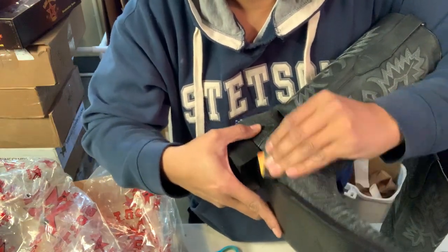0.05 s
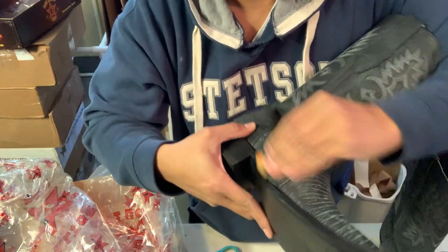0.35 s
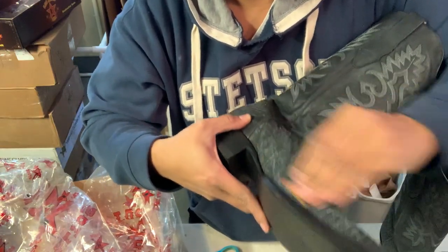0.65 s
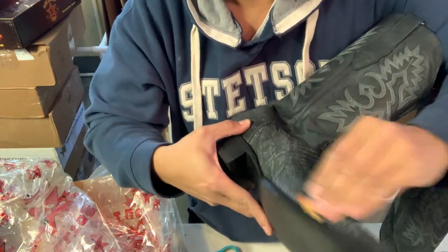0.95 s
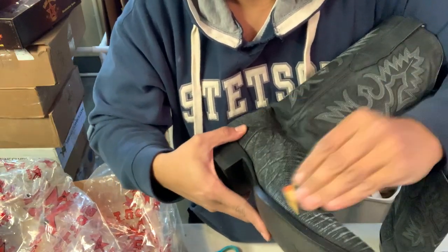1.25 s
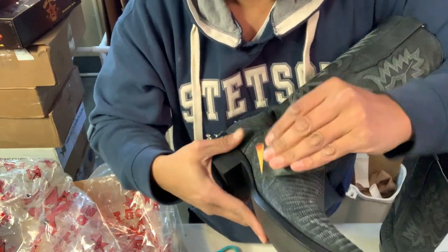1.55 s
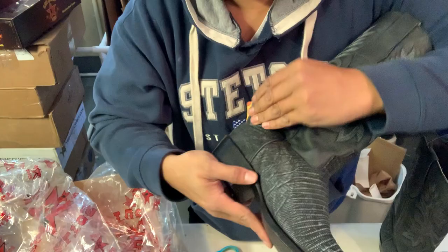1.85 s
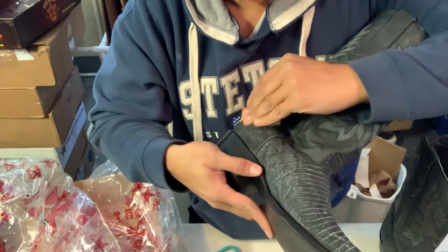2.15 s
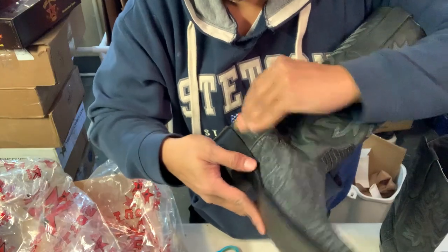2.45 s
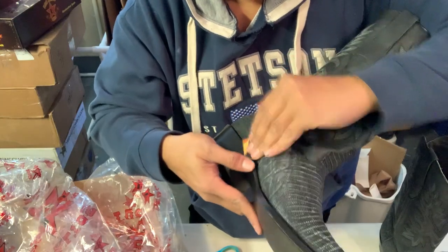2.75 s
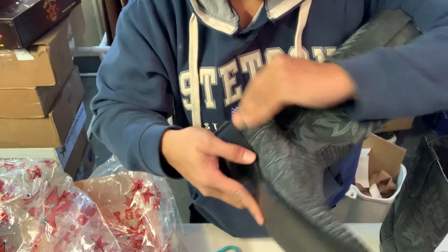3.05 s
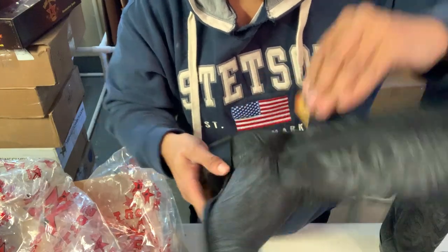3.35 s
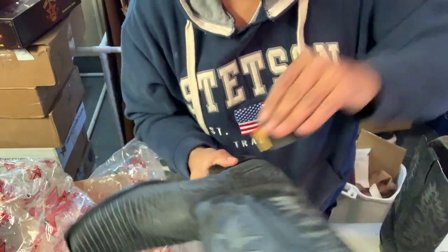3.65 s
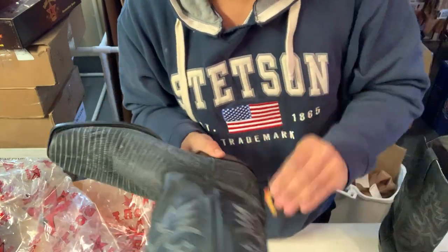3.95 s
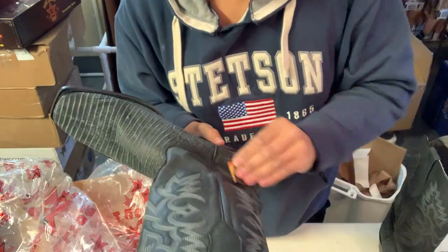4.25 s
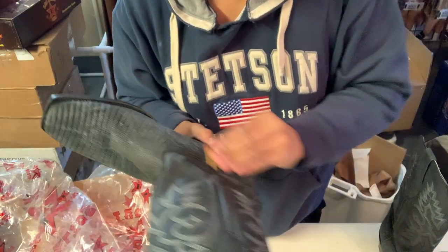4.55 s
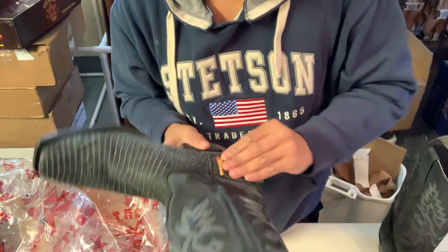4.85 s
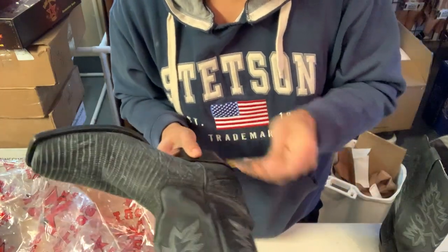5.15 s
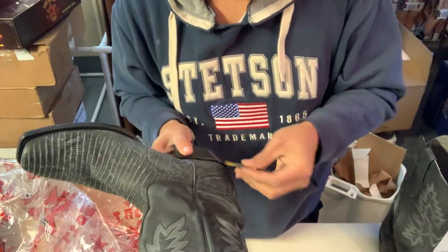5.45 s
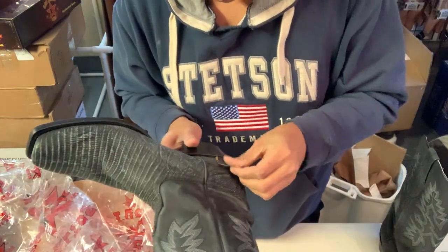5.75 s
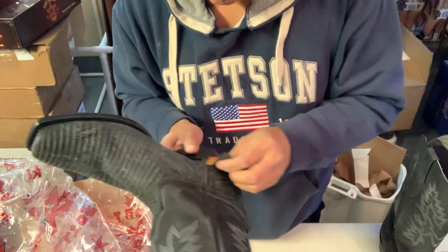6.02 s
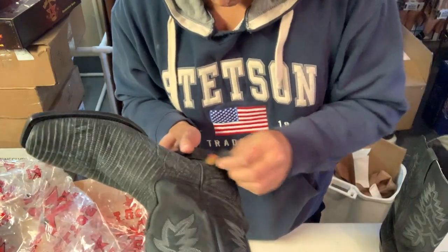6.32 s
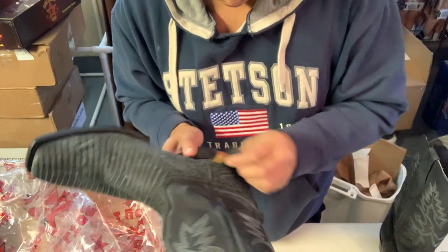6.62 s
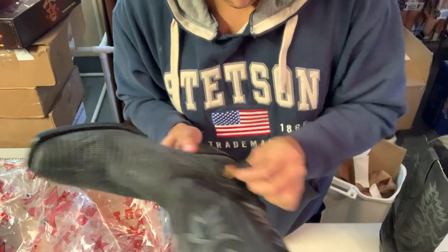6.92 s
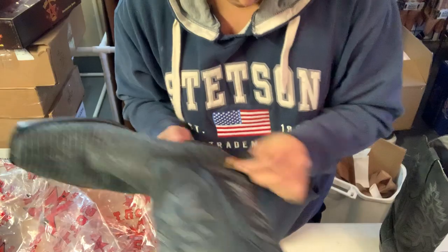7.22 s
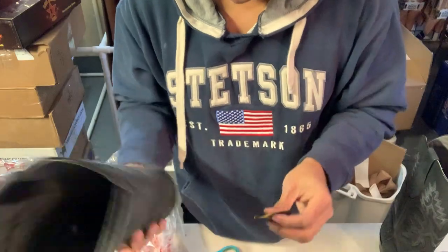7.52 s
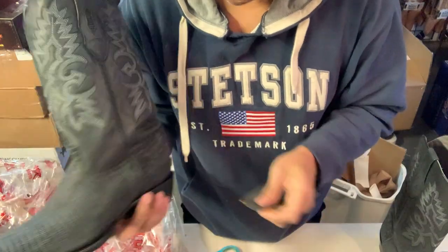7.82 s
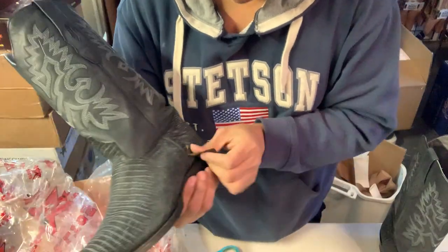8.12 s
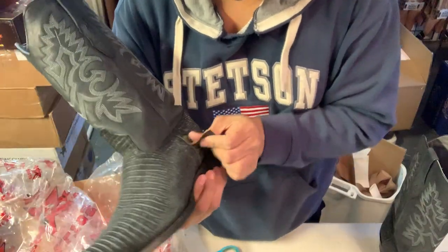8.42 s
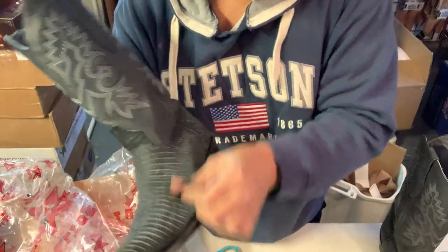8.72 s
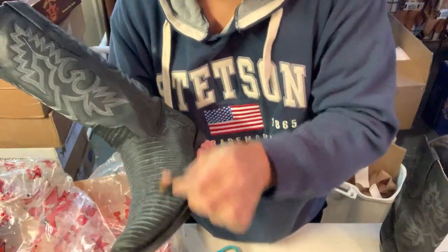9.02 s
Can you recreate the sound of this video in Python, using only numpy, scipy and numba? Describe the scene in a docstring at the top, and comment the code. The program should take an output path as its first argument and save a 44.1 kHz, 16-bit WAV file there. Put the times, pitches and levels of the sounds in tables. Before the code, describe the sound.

Sandpaper rasps back and forth over a hollow leather boot in quick runs of strokes, with light taps and soft thumps between.

```python
"""First comes a gritty hiss: folded sandpaper rubbed back and forth over a leather boot, close to a phone.
On each stroke the grit rasps over the leather and shakes the hollow boot. The paper taps as it lands
and squeaks where its edge catches. Bumps make the boot thump, and shifting fingers make it rumble.
Soft, airy rustles come in the pauses between runs of strokes.
The small workshop adds a short echo and a faint, steady rush of air."""
import sys
import numpy as np
from scipy import signal
from scipy.fft import rfft, irfft, next_fast_len
from scipy.io import wavfile
from numba import njit

SR = 44100
rng = np.random.default_rng(int(sys.argv[2]) if len(sys.argv) > 2 else 0)


def wrap_up_sound(samples):
    """Save the sound to the file named by the first command line argument, as 16-bit audio."""
    columns = np.atleast_2d(samples).T
    # keep every value between -1 and 1, then stretch to whole-number steps
    tamed = np.clip(columns, -1, 1)
    steps = np.round(tamed * 32767).astype(np.int16)
    wavfile.write(sys.argv[1], SR, steps)


N = 404838
TIME = np.arange(N) / SR

# Two terms: t60 is the time a sound takes to fade by 60 dB; a higher Q means a sharper, longer ring.
# passes of the paper: start/s, end/s, fastest moment/share of the stroke, level/dB, rasp boost/dB
PAPER_STROKES = [(-0.07, 0.166, 0.35, -32, -9.5), (0.162, 0.196, 0.67, -51, -1),
                 (0.281, 0.303, 0.85, -49.5, 2.5), (0.314, 0.577, 0.27, -36.5, -7.5),
                 (0.662, 0.703, 0.09, -59.5, 10), (0.685, 0.889, 0.32, -35.5, -8),
                 (0.881, 0.924, 0.57, -54, -0.5), (1.017, 1.225, 0.31, -33.5, -9),
                 (1.336, 1.523, 0.35, -33.5, -6), (1.489, 1.517, 0.75, -38.5, -7.5),
                 (1.538, 1.599, 0.75, -44.5, -2.5), (1.692, 1.801, 0.35, -46.5, -0.5),
                 (1.771, 1.887, 0.53, -40, -4.5), (1.85, 1.979, 0.28, -38, -4.5),
                 (2.092, 2.126, 0.14, -62, 10), (2.109, 2.239, 0.48, -38.5, -7),
                 (2.233, 2.365, 0.8, -34.5, -8.5), (2.361, 2.482, 0.51, -37, -6.5),
                 (2.497, 2.591, 0.49, -34, -8.5), (2.591, 2.715, 0.34, -35, -8),
                 (2.721, 2.821, 0.81, -33.5, -8.5), (2.83, 2.944, 0.28, -35.5, -7.5),
                 (2.947, 3.054, 0.76, -32.5, -9), (3.059, 3.149, 0.6, -31.5, -8.5),
                 (3.176, 3.314, 0.32, -37, -8.5), (3.834, 3.94, 0.2, -58.5, 8),
                 (3.897, 3.987, 0.6, -35, -8), (4.148, 4.312, 0.47, -43, -4), (4.308, 4.418, 0.6, -36, -8),
                 (4.445, 4.565, 0.48, -38.5, -8.5), (4.558, 4.725, 0.55, -35, -8),
                 (4.714, 4.903, 0.54, -38, -5), (4.926, 5.087, 0.43, -47, -2.5),
                 (5.078, 5.276, 0.5, -67, 4.5), (5.28, 5.356, 0.44, -65.5, -2.5),
                 (5.364, 5.477, 0.7, -75, 9), (5.451, 5.54, 0.7, -58.5, -1), (5.752, 5.895, 0.34, -60.5, 6),
                 (5.852, 6.012, 0.74, -47.5, -1.5), (6.019, 6.162, 0.61, -41.5, -8.5),
                 (6.167, 6.288, 0.62, -39.5, -6.5), (6.306, 6.428, 0.6, -46, -1),
                 (6.444, 6.567, 0.63, -39.5, -3), (6.57, 6.752, 0.46, -43.5, -2.5),
                 (6.735, 6.884, 0.62, -38, -3.5), (6.871, 7.04, 0.69, -36.5, -8.5),
                 (7.029, 7.177, 0.49, -38.5, -7), (7.185, 7.345, 0.61, -35.5, -7.5),
                 (8.09, 8.156, 0.67, -58, 2), (8.148, 8.301, 0.6, -46.5, 0.5),
                 (8.288, 8.415, 0.36, -40.5, -3.5), (8.411, 8.735, 0.67, -36.5, -6),
                 (8.723, 8.896, 0.37, -39.5, -6.5), (8.885, 9.041, 0.58, -36.5, -7),
                 (9.037, 9.199, 0.61, -36, -9.5)]
# the spot under the paper: t/s, scrape boost/dB, body boost/dB, wall pitch/Hz, left microphone's lead/ms
BOOT_SPOTS = [(.05, -11.5, -15, 255, 0.013), (.45, -8.5, -9, 235, 0.034), (1.1, -2.5, -4.5, 245, 0.043),
              (1.6, -5.5, -8.5, 217, 0.048), (2.15, -9.5, -11.5, 220, 0.058),
              (2.55, -15, -21.5, 302, 0.055), (3.1, -15, -19, 252, 0.052), (3.25, -6.5, -9.5, 262, 0.065),
              (3.95, -7, -10, 245, 0.088), (4.6, -2, -9, 370, 0.11), (4.85, -10.5, -11, 197, 0.098),
              (5.3, -16.5, -31.5, 186, 0.11), (6.15, -17, -26, 318, 0.1), (6.6, -13.5, -16, 197, 0.11),
              (7.25, -10.5, -10, 224, 0.11), (8.25, -16, -26.5, 260, .12), (8.75, -11.5, -6, 322, 0.13),
              (9.15, -10.5, -3, 318, 0.135)]
# the paper's fold rings differently with each grip: t/s, pitch at full speed/Hz, ring level/dB
FOLD_RINGS = [(1.2, 4600, -17), (1.9, 3700, -8), (2.5, 3820, -11), (3.1, 3780, -8), (4.6, 4200, -7),
              (6.2, 3800, -8), (6.55, 3420, -6), (6.82, 2560, 7), (7.1, 3560, -5), (8.3, 4050, -10),
              (8.55, 5650, -2), (9.1, 5700, 10)]
# tone of the rubbing grit: f/Hz, level/dB
GRIT_TONE = [(100, 2), (180, 4), (310, 4), (420, 5.5), (560, -6.5), (740, -1.5), (1020, -4.5), (1300, 1),
             (1850, 0), (2500, -3), (3600, 1.5), (4500, 1.5), (5800, -0.5), (7200, 2.5), (8600, -1),
             (10500, 6.5), (13000, 5), (16000, 6)]
# ranges of a stroke's hiss, rasp, scrape and body: low f/Hz, high f/Hz
LAYER_BANDS = [(7000, 15800), (2500, 7000), (650, 2500), (130, 650)]
# the stiff leather's rings: f/Hz, Q, level/dB
LEATHER_RINGS = [(728, 6.1, 2), (1164, 4.3, -2), (1806, 5.4, -2.5)]
# tone of the boot moving in the hand: f/Hz, level/dB
RUMBLE_TONE = [(20, -60), (40, -12), (60, 1.5), (85, -3.5), (125, -5), (190, -2.5), (400, -42.5),
               (2000, -101)]
# how much sound bounces off hands and bench: f/Hz, level/dB
SCATTER_TONE = [(200, -5.5), (700, -7), (4000, -6), (6500, -9.5), (9000, 4.5), (15000, -28)]
# tone of the workshop's air: f/Hz, level/dB
AIR_TONE = [(25, -21), (60, -4), (150, -7.5), (300, -17.5), (1000, -22.5), (4000, -23), (9000, -30),
            (15000, -34)]
# how long the workshop echoes: f/Hz, t60/s
ECHO_FADE = [(150, 0.38), (1000, 0.34), (4000, 0.25), (9000, 0.32), (15000, 0.16)]
# tone of that echo: f/Hz, level/dB
ECHO_TONE = [(200, 4), (1000, 3.5), (4500, 2), (9000, 1), (16000, -4)]
# the paper lands or its edge catches: t/s, slap level/dB, scratch level/dB, slap t60/s
PAPER_TAPS = [(0.2844, -61, -38, .03), (.335, -62, -35, 0.06), (.373, -62, -29, 0.087),
              (0.6677, -55, -51, 0.034), (.7, -63, -44, .04), (1.0156, -38, -33, .022),
              (1.0235, -37, -47, 0.018), (1.3384, -41, -44, .02), (1.507, -40, -30.5, 0.021),
              (1.585, -38, -54, 0.026), (1.591, -35, -54, 0.021), (1.6926, -48.5, -63, 0.049),
              (1.8602, -39.5, -31.5, .043), (2.0986, -48, -60, .043), (2.333, -41.5, -44, 0.053),
              (2.451, -43.5, -39, 0.048), (2.742, -50.5, -41, .04), (2.8554, -48.5, -32, .043),
              (3.012, -45, -40, 0.015), (3.08, -49.5, -31, 0.048), (3.192, -47, -39.5, 0.044),
              (3.85, -35, -61, 0.03), (3.946, -42, -54, .08), (4.159, -37, -58, 0.038),
              (4.164, -37, -40, 0.018), (4.583, -53, -36.5, 0.039), (4.797, -39.5, -63, 0.039),
              (5.639, -57.5, -60, 0.091), (5.673, -44.5, -41.5, 0.033), (6.185, -69, -42, 0.036),
              (6.456, -66, -44, .043), (7.32, -37.5, -34.5, 0.036), (7.5, -83, -58, .043),
              (7.521, -56, -52.5, 0.048), (8.097, -51, -74, .043), (8.12, -49, -46.5, 0.1),
              (8.742, -51, -41, 0.05)]
# tone of paper slapping leather: f/Hz, level/dB
SLAP_TONE = [(150, 1.5), (400, 1.5), (1200, 10), (2200, 5.5), (4000, 7), (5500, -37.5), (12000, -7)]
# the boot is bumped or gripped anew: t/s, thump level/dB, wall pitch/Hz, boom level/dB
BOOT_KNOCKS = [(0.673, -61, 149, -56.5), (1.023, -45, 218, -59), (1.08, -44, 240, -62),
               (1.374, -39.5, 254, -62), (1.697, -44.5, 239, -57), (2.103, -45.5, 216, -49),
               (2.803, -46, 214, -69), (2.824, -46.5, 163, -67), (3.535, -55, 288, -67),
               (3.622, -55.5, 260, -74), (3.853, -34.5, 185, -38.5), (3.99, -41, 212, -48),
               (4.165, -34, 160, -36), (4.679, -41, 169, -51), (5.04, -66, 131, -52),
               (5.671, -48.5, 664, -78), (5.673, -47, 470, -76), (6.603, -46, 295, -66),
               (6.805, -47, 474, -70), (7.113, -46, 470, -70), (7.346, -39, 289, -53),
               (7.521, -52, 656, -70), (7.522, -50.5, 267, -43), (7.758, -43.5, 243, -52),
               (7.952, -61, 220, -68), (8.099, -50.5, 311, -70), (8.316, -49, 325, -78)]
# the rings of the boot's hollow: f/Hz, level/dB, t60/s
HOLLOW_RINGS = [(58.9, -6, 0.12), (117, -13.5, 0.098), (204, -25, 0.073), (421, -23, 0.068),
                (710, -34, 0.044)]
# the hands shift their hold: start/s, end/s, level/dB
HAND_SHIFTS = [(1.35, 1.526, -62.5), (2.82, 2.918, -64), (3.9, 4.054, -55), (4.72, 5.11, -64),
               (5.92, 6.007, -68.5), (6.241, 6.31, -66.5), (6.36, 7.613, -57.5), (8.9, 9.25, -75)]
# the paper's edge catches and chatters: start/s, end/s, first pitch/Hz, last pitch/Hz, level/dB
EDGE_SQUEAKS = [(1.495, 1.519, 2520, 2420, -45), (1.55, 1.585, 4200, 3200, -41.5),
                (1.583, 1.591, 1300, 1150, -44), (3.262, 3.297, 3270, 2700, -47.5),
                (3.271, 3.29, 1470, 1260, -53.5), (6.22, 6.269, 3840, 3500, -50),
                (7.305, 7.328, 2600, 2440, -46.5)]
# soft, airy rustles in the pauses between runs of strokes: start/s, end/s, level/dB, treble boost/dB
SOFT_RUSTLES = [(3.287, 3.825, -67.5, -3.5), (3.52, 3.59, -60.5, -11), (3.596, 3.746, -58, -34),
                (7.265, 7.402, -54, -1), (7.485, 7.632, -70, 6.5), (7.741, 7.93, -61, 5),
                (7.823, 8.197, -64, 3.5)]
# tone of those rustles: f/Hz, level/dB
RUSTLE_TONE = [(60, -12), (280, -11.5), (600, -11), (1400, -11), (4000, -10), (8000, -13.5), (16000, -13.5)]
# the part of the room's sound that the two microphones hear oppositely: f/Hz, level/dB
SIDE_TONE = [(60, -3.5), (250, -5), (600, 2.5), (6500, -14), (8300, -38), (9500, -2.5), (16000, -22)]
# how far the left microphone's wave runs ahead in the high treble: f/Hz, phase/radians
MIC_PHASE = [(8400, 3), (9600, 2.3), (11000, 1.1), (12000, .15), (13000, -.25), (14000, -1.2), (16000, -3)]
# the left microphone is weaker in the bass: f/Hz, left minus right level/dB
MIC_BALANCE = [(50, -3), (180, -4), (350, -4.5), (650, 1), (16000, -0.5)]

HISS_DB, RASP_DB, SCRAPE_DB, BODY_DB, ROCKING_DB = -3.5, -3, -4, -6, -29.5  # balance within a stroke
# layers grow as speed to these powers: hiss needs speed, but these go on while the paper slows
RASP_POWER, SCRAPE_POWER, BODY_POWER = 0.58, 0.37, 0.42
STROKE_CURVE, PRESS_POWER = 1.635, 2.7  # higher values narrow the peaks of speed and of hand pressure
WALL_SPREAD, WALL_FALL, WALL_WANDER = 0.12, 1.44, 0.19  # octaves: between strokes, over one, wavering
FOLD_SAG, FOLD_WANDER = 0.19, 0.15  # octaves: drop at rest, wavering
LEATHER_WANDER = 0.11  # octaves
SNAGS_PER_S, SNAG_DB = 37, -17.5
STICK_S, STICK_SHARE, STUCK_DB, BITE_DB, BITE_S = 0.072, 0.088, 1, 3.5, 0.022
AIR_DB, ECHO_DB, SCATTER_STEP_S = -75.5, -15.5, 0.02
TAP_RISE_S = 0.0003  # the leather gives way under a tap
YIELD_OCTAVES, YIELD_S, KNOCK_T60_S, BOOM_RISE_S = 0.2, 0.024, 0.052, 0.019
SLIP_DB, SLIPS_PER_S = 1.5, 21  # how unevenly the fingers slip, and how often
CHATTER_HZ, CHATTER_OCTAVES, CHATTER_DB = 261, 0.3, 6  # a squeak's flutter: rate, wavering, depth
TOP_HZ = 15850


def undb(db):
    """Turn decibels into a number to multiply by."""
    return 10 ** (np.asarray(db) / 20)


def unit(x):
    """Scale a sound to an average power of 1."""
    return x / np.sqrt(np.mean(x ** 2) + 1e-24)


def freqs(x):
    """The frequencies that make up x."""
    return np.maximum(np.fft.rfftfreq(x.shape[-1], 1 / SR), 1)


def lookup(table, hz):
    """Read a table by frequency, sliding between its rows evenly in pitch."""
    f, value = np.transpose(table)
    return np.interp(np.log(hz), np.log(f), value)


def at_time(table, s):
    """Read a table's columns at one moment."""
    when, *columns = np.transpose(table)
    return [np.interp(s, when, column) for column in columns]


def colour(x, table):
    """Give a sound the tone in a table of f/Hz, level/dB."""
    padded = np.pad(x, (0, next_fast_len(len(x), True) - len(x)))
    gain = undb(lookup(table, freqs(padded)))
    return irfft(rfft(padded) * gain, len(padded))[:len(x)]


def band(x, lo, hi, order=3):
    """Keep the frequencies between lo and hi."""
    sections = signal.butter(order, [lo, min(hi, SR / 2 - 100)], "band", fs=SR, output="sos")
    return signal.sosfilt(sections, x)


def add(out, s, x):
    """Mix x into out, starting at s seconds."""
    i = int(s * SR)
    x = x[..., max(-i, 0):N - i]
    out[..., max(i, 0):max(i, 0) + x.shape[-1]] += x


def wander(n, rate):
    """Drift about 1 either side of zero, toward a new random value rate times a second."""
    return 1.2 * np.interp(np.arange(n) * rate / SR, np.arange(4096), rng.standard_normal(4096))


def hump(t, length, crest):
    """A smooth swell: from zero to 1 at the crest (a share of its length) and back to zero."""
    peak = np.clip(crest, .02, .98) * length
    return np.sin(np.pi / 2 * np.interp(t, [0, peak, length], [0, 1, 0]))


@njit
def resonate(x, hz, q):
    """Make x ring at a pitch that can keep moving."""
    out, band_state, low_state = np.empty(len(x)), 0., 0.
    for i in range(len(x)):
        tuning = np.tan(np.pi * hz[i] / SR)
        ring = (band_state + tuning * (x[i] - low_state)) / (1 + tuning * (tuning + 1 / q))
        band_state = 2 * ring - band_state
        low_state += 2 * tuning * ring
        out[i] = ring / q
    return out


def sanding():
    """On each stroke the grit judders over the leather, shakes the boot and rocks it in the hand."""
    out = np.zeros((2, N))
    for start, end, crest, db, rasp_db in PAPER_STROKES:
        scrape_db, body_db, wall_hz, lead_ms = at_time(BOOT_SPOTS, (start + end) / 2)
        fold_hz, fold_db = at_time(FOLD_RINGS, (start + end) / 2)
        length = end - start
        t = TIME[:int(length * SR) + SR // 20]
        n = len(t)
        speed = hump(t, length, crest) ** STROKE_CURVE
        judder = wander(n, rate=328.2) + 2.13 * wander(n, rate=66.7)
        fine = colour(grit(n, spread_db=4.5) * undb(0.58 * judder), GRIT_TONE)
        coarse = unit(colour(grit(n, spread_db=2.5) * undb(0.81 * judder), GRIT_TONE))

        shake = boot_shake(coarse, wall_hz, speed, progress=np.minimum(t / length, 1))
        fold = undb(fold_db) * fold_ring(coarse, fold_hz, speed)
        layers = fine, coarse + fold, leather_scrape(coarse), shake
        hiss, rasp, scrape, body = (unit(band(x, *edges)) for x, edges in zip(layers, LAYER_BANDS))
        rocking = unit(colour(rng.standard_normal(n), RUMBLE_TONE))
        catches = unit(undb(1.4 * wander(n, rate=48.3)))

        rough = speed ** RASP_POWER * (undb(RASP_DB) * rasp + undb(SNAG_DB) * snags(n))
        rough += undb(scrape_db + SCRAPE_DB) * speed ** SCRAPE_POWER * catches * scrape
        boot = speed ** BODY_POWER * (undb(body_db + BODY_DB) * body + undb(ROCKING_DB) * rocking)
        paper = bite(t, length) * (undb(HISS_DB) * speed * hiss + undb(rasp_db) * rough)
        sound = undb(db) * (paper + undb(rasp_db) * boot)
        bounces = [scatter(colour(sound, SCATTER_TONE), t60=0.021) for _ in range(2)]
        add(out, start, microphones(sound, lead_ms) + all_around(*bounces))
    return out


def grit(n, spread_db):
    """Countless tiny cracks of very unequal size blend into noise."""
    return unit(rng.standard_normal(n) * undb(spread_db * np.clip(rng.standard_normal(n), -3, 3)))


def boot_shake(rubbing, hz, speed, progress):
    """The wall's ring sinks in pitch as the paper travels, and swells as the hand bears down."""
    octaves = WALL_SPREAD * rng.standard_normal() + WALL_FALL * (.4 - progress)
    octaves += WALL_WANDER * wander(len(rubbing), rate=29.6)
    ring = unit(wall_ring(rubbing, hz * 2 ** octaves, q=3.9))
    return ring * speed ** PRESS_POWER + 4.1 * rubbing


def wall_ring(x, hz, q):
    """The boot's leather wall rings briefly at one main pitch, with weaker ones on either side."""
    return sum(undb(db) * resonate(x, hz * ratio, float(q))
               for ratio, db in [(.63, -9), (1, -1.5), (1.45, -10.5), (2.6, -5)])


def fold_ring(rubbing, hz, speed):
    """The paper's fold rings unsteadily, lower when the hand moves slowly."""
    octaves = FOLD_SAG * (speed - 1) + FOLD_WANDER * wander(len(rubbing), rate=30)
    return resonate(rubbing, hz * 2 ** octaves, q=5.8)


def leather_scrape(rubbing):
    """Scraped leather adds a few stiff rings that shift with the pressure of the hand."""
    shift = 2 ** (LEATHER_WANDER * wander(len(rubbing), rate=19.5))
    return rubbing + sum(undb(db) * resonate(rubbing, hz * shift, float(q)) for hz, q, db in LEATHER_RINGS)


def snags(n):
    """Single coarse grains snag on the leather with dry ticks."""
    snagged = rng.random(n) < SNAGS_PER_S / SR
    clicks = snagged * rng.uniform(0.45, 1, n) * np.sqrt(SR / SNAGS_PER_S)
    t = TIME[:SR // 100]
    tick = band(rng.standard_normal(len(t)) * np.exp(-t / 0.0013), 1190, 2450, order=2)
    return signal.fftconvolve(clicks, tick / np.linalg.norm(tick))[:n]


def bite(t, length):
    """The paper sticks as a stroke starts, then gets louder for a moment as it breaks free."""
    since_free = t - min(STICK_S, STICK_SHARE * length)
    return undb(np.where(since_free < 0, STUCK_DB, BITE_DB * np.exp(-np.abs(since_free) / BITE_S)))


def scatter(x, t60):
    """Sound bounces off leather, hand and bench in a pattern that changes as the hand moves."""
    t, step = TIME[:SR // 32], int(SCATTER_STEP_S * SR)
    centres = np.arange(0, len(x) + step, step)[:, None]
    fades = np.sqrt(np.maximum(1 - np.abs(np.arange(len(x)) - centres) / step, 0))
    patterns = rng.standard_normal((len(centres), len(t))) * undb(-60 * t / t60)
    patterns /= np.linalg.norm(patterns, axis=1, keepdims=True)
    return signal.fftconvolve(x * fades, patterns, axes=1).sum(axis=0)[:len(x)]


def room_air():
    """The workshop's air is a steady noise, strongest in the bass."""
    return unit(colour(rng.standard_normal(N), AIR_TONE))


def room_echo(x):
    """The workshop answers with a short echo whose highest treble fades first."""
    t, tail = TIME[:SR // 2], 0
    edges = np.geomspace(60, 16000, 9)
    for lo, hi in zip(edges, edges[1:]):
        decay = undb(-60 * t / lookup(ECHO_FADE, np.sqrt(lo * hi)))
        tail = tail + band(rng.standard_normal(len(t)), lo, hi) * decay * (t > .005)
    tail = colour(tail / np.linalg.norm(tail), ECHO_TONE)
    return signal.fftconvolve(x, tail)[:N]


def taps():
    """The stiff paper slaps the leather: a short dull crack with a scratch of grit."""
    out, t = np.zeros(N), TIME[:SR // 10]
    for s, slap_db, scratch_db, t60 in PAPER_TAPS:
        fade = undb(-60 * t / t60) * (1 - np.exp(-t / TAP_RISE_S))
        slap = unit(colour(grit(len(t), spread_db=2), SLAP_TONE))
        scratch = unit(band(rng.standard_normal(len(t)), 5500, 12000, order=2))
        add(out, s, undb(slap_db) * slap * fade + undb(scratch_db) * scratch * fade ** 1.16)
    return microphones(out, lead_ms=0.057)


def knocks():
    """A soft blow thumps the wall, whose pitch sinks as the leather gives; the hollow booms after it."""
    out, t = np.zeros(N), TIME[:SR // 2]
    hollow = sum(undb(db - 60 * t / t60) * np.sin(2 * np.pi * hz * t) for hz, db, t60 in HOLLOW_RINGS)
    boom = hollow * (1 - np.exp(-(t / BOOM_RISE_S) ** 2))
    for s, db, wall_hz, boom_db in BOOT_KNOCKS:
        push = np.sin(2 * np.pi * np.minimum(t * wall_hz, 1))  # a single swing
        octaves = YIELD_OCTAVES * (np.exp(-t / YIELD_S) - .7)
        thump = wall_ring(push, wall_hz * 2 ** octaves, q=np.pi * wall_hz * KNOCK_T60_S / np.log(1000))
        add(out, s, undb(db) * thump / np.abs(thump).max() + undb(boom_db) * boom / np.abs(boom).max())
    return microphones(out, lead_ms=.05)


def finger_rumble():
    """Fingers slip and catch on the boot with a low rumble."""
    out = np.zeros(N)
    for start, end, db in HAND_SHIFTS:
        t = TIME[:int((end - start) * SR)]
        slips = rng.standard_normal(len(t)) * undb(SLIP_DB * wander(len(t), SLIPS_PER_S))
        rumble = colour(slips, RUMBLE_TONE) * hump(t, end - start, crest=0.51)
        add(out, start, undb(db) * unit(rumble))
    return microphones(out, lead_ms=0.06)


def squeaks():
    """The paper's edge sticks and slips quickly, with a ring that sinks as the paper bends."""
    out = np.zeros(N)
    for start, end, first_hz, last_hz, db in EDGE_SQUEAKS:
        t = TIME[:int((end - start) * SR)]
        cycles = np.cumsum(CHATTER_HZ * 2 ** (CHATTER_OCTAVES * wander(len(t), rate=222))) / SR
        slips = rng.standard_normal(len(t)) * undb(CHATTER_DB * np.cos(2 * np.pi * cycles))
        ring = resonate(slips, np.geomspace(first_hz, last_hz, len(t)), q=5.6)
        add(out, start, undb(db) * unit(ring) * hump(t, end - start, crest=0.78))
    return microphones(out, lead_ms=0.061)


def soft_rustle():
    """Soft, airy noise swells, flickers and fades in the pauses between runs of strokes."""
    out = np.zeros(N)
    for start, end, db, treble_db in SOFT_RUSTLES:
        t = TIME[:int((end - start) * SR)]
        flickering = rng.standard_normal(len(t)) * undb(2.1 * wander(len(t), rate=59.6))
        airy = unit(colour(flickering, RUSTLE_TONE))
        rustle = colour(airy, [(1500, 0), (8000, treble_db)])
        add(out, start, undb(db) * rustle * hump(t, end - start, crest=0.33))
    return microphones(out, lead_ms=0.06)


def microphones(x, lead_ms):
    """Sound reaches the left microphone first; in the high treble the phone itself sets the timing."""
    padded = np.pad(x, (0, next_fast_len(len(x) + 64, True) - len(x)))
    by_direction = [(0, 0), (6700, 2 * np.pi * 6.7 * lead_ms)]
    phase = np.interp(freqs(padded), *np.transpose(by_direction + MIC_PHASE))
    left_right = np.exp(.5j * phase * np.array([[1], [-1]]))
    return irfft(rfft(padded) * left_right, len(padded))[:, :len(x)]


def all_around(shared, side):
    """Sound from all round: the microphones share one part and hear the other oppositely."""
    opposite = microphones(colour(side, SIDE_TONE), lead_ms=0.13) * np.array([[1], [-1]])
    return microphones(shared, lead_ms=0.036) + opposite


def scene():
    """The close sounds, their echoes and the air of the workshop."""
    close = sanding() + squeaks() + taps() + knocks() + finger_rumble() + soft_rustle()
    echoes = all_around(room_echo(close[0]), room_echo(close[0]))
    air = all_around(room_air(), room_air())
    return close + undb(ECHO_DB) * echoes + undb(AIR_DB) * air


def record(dry):
    """The phone hears less bass on the left than on the right, and cuts the highest treble."""
    left = colour(dry[0], [(hz, db / 2) for hz, db in MIC_BALANCE])
    right = colour(dry[1], [(hz, -db / 2) for hz, db in MIC_BALANCE])
    treble_cut = signal.ellip(10, .2, 70, TOP_HZ, fs=SR, output="sos")
    return signal.sosfilt(treble_cut, np.array([left, right]))


dry = scene()
out = record(dry)
wrap_up_sound(out)
```